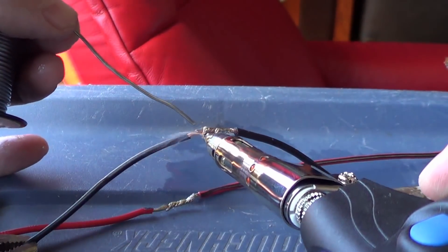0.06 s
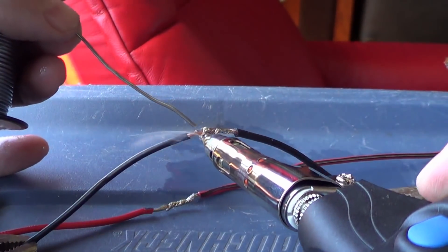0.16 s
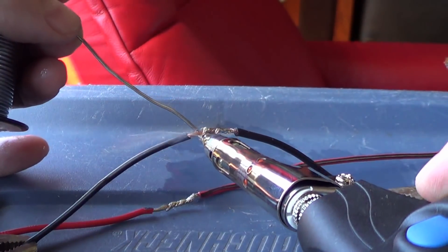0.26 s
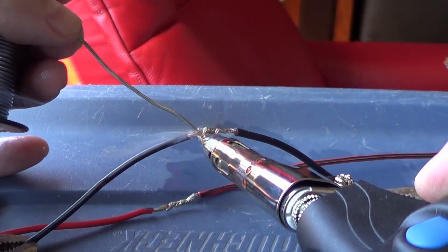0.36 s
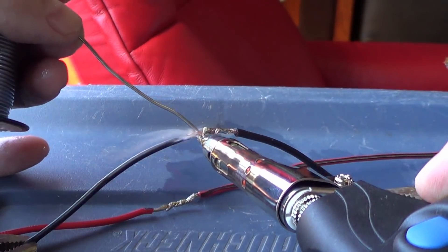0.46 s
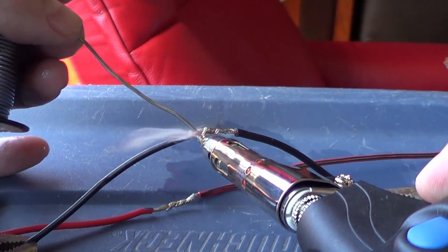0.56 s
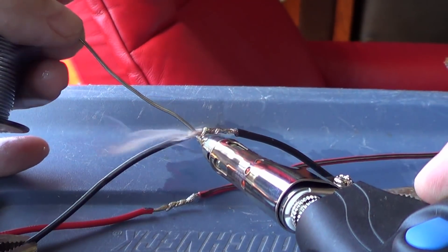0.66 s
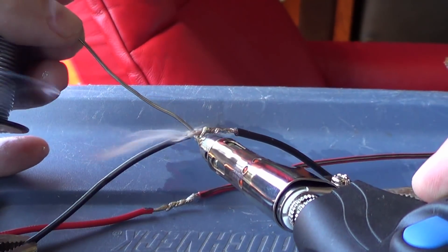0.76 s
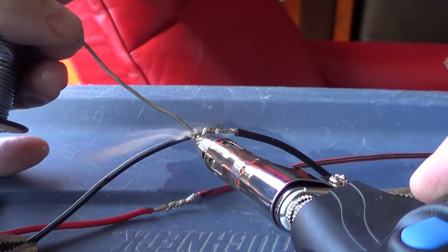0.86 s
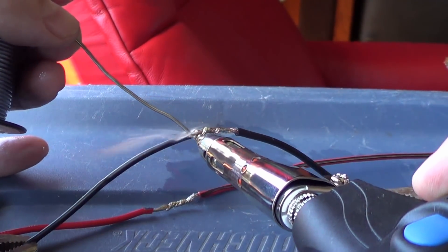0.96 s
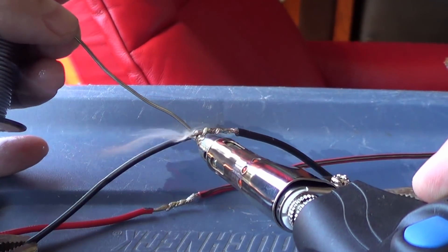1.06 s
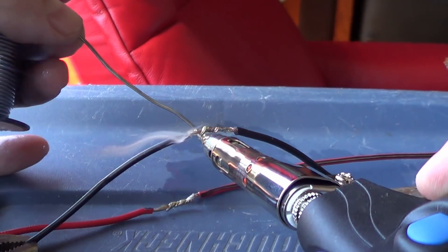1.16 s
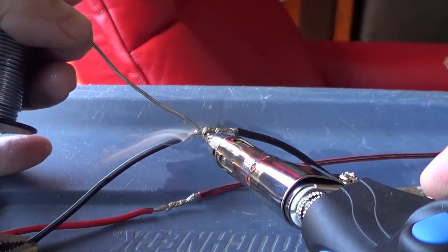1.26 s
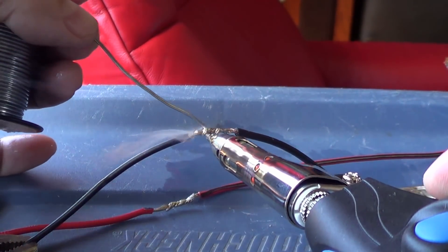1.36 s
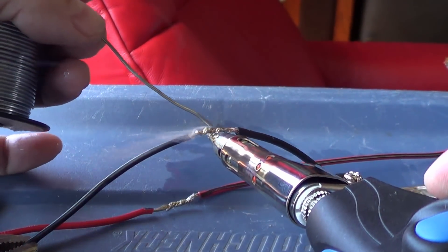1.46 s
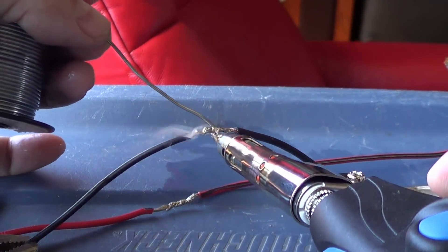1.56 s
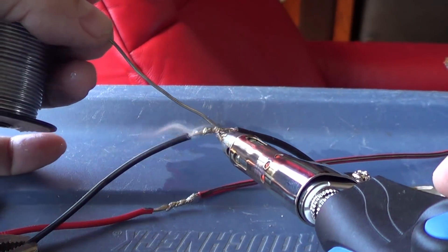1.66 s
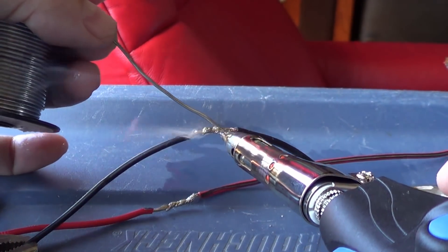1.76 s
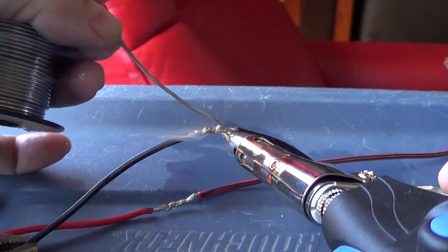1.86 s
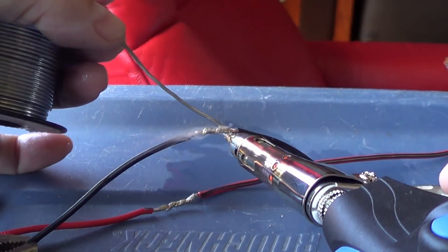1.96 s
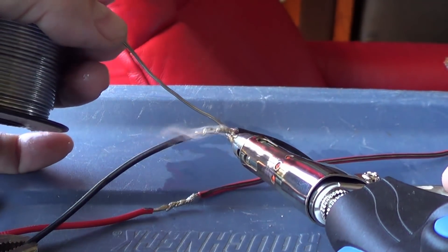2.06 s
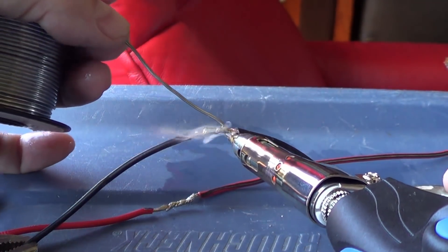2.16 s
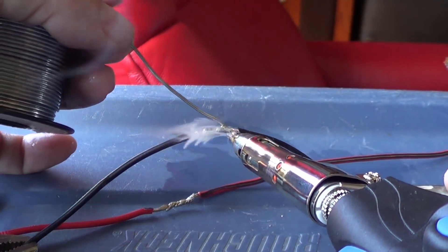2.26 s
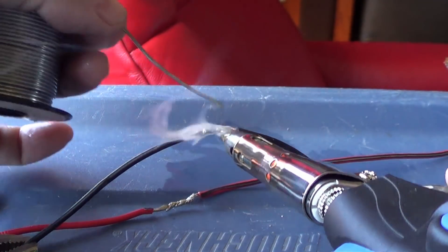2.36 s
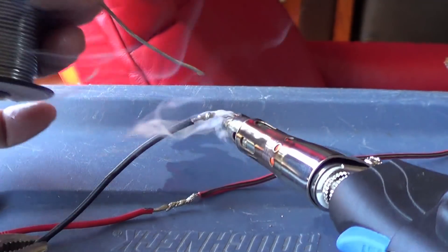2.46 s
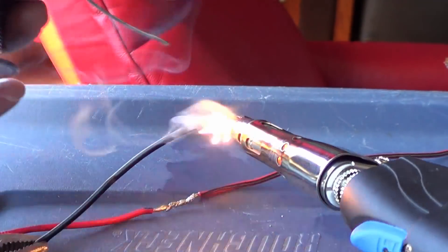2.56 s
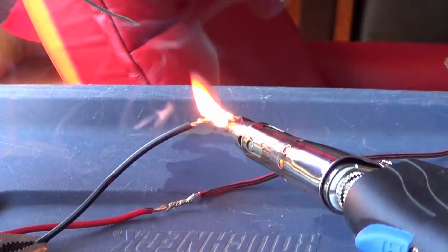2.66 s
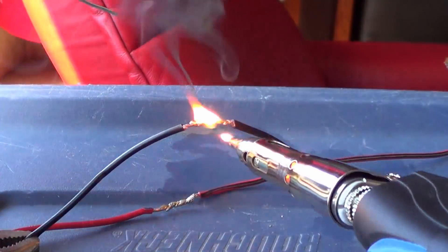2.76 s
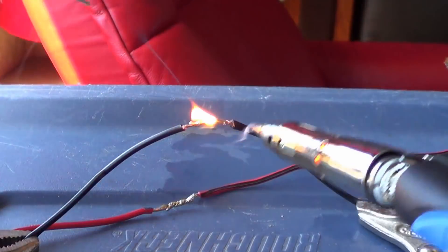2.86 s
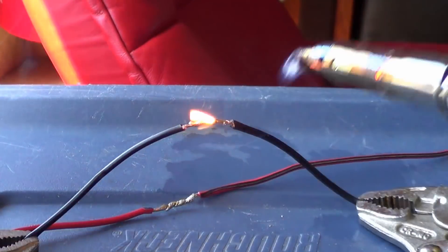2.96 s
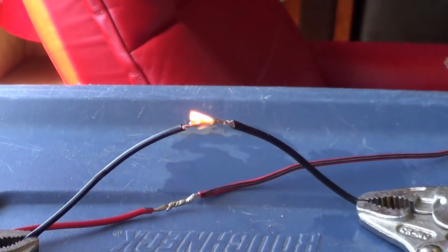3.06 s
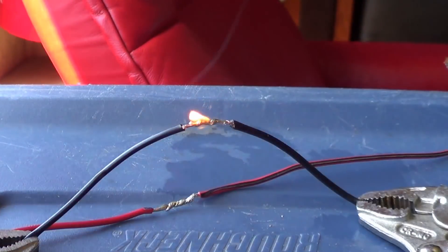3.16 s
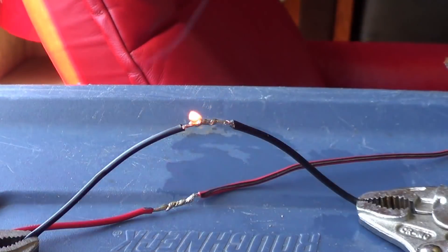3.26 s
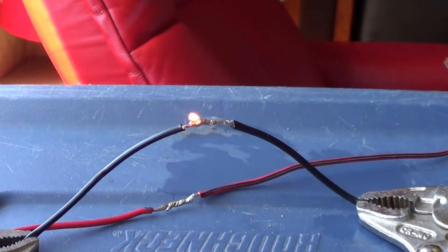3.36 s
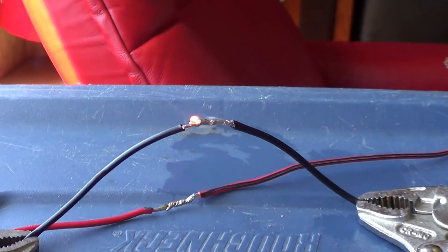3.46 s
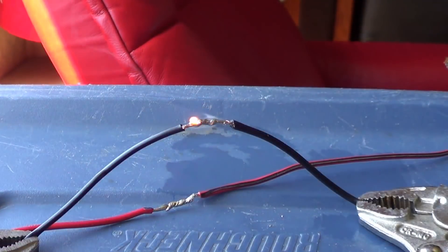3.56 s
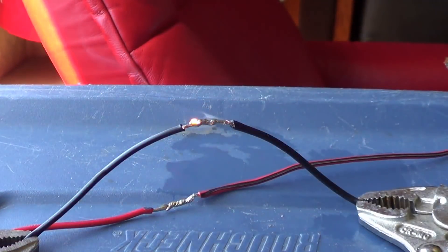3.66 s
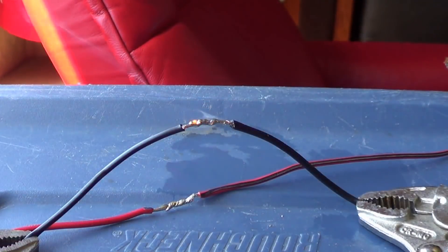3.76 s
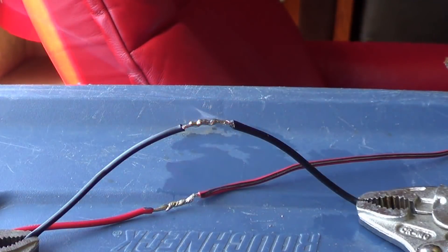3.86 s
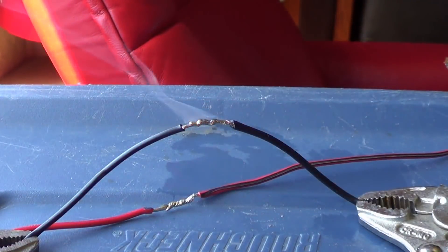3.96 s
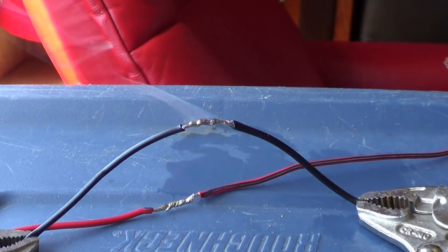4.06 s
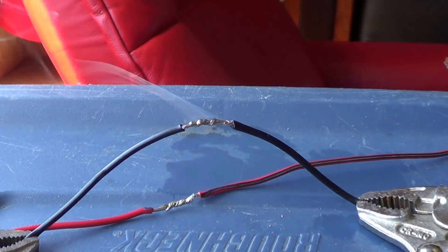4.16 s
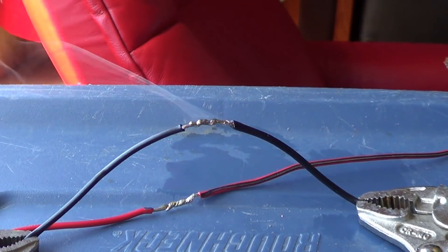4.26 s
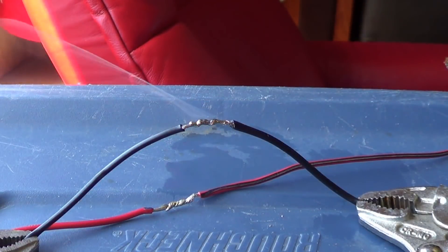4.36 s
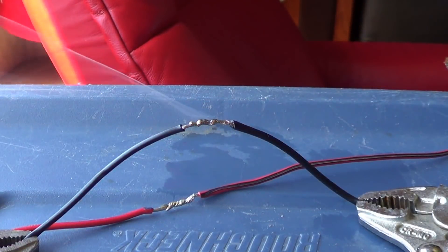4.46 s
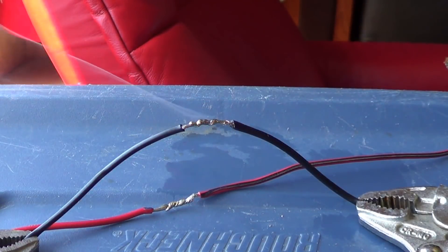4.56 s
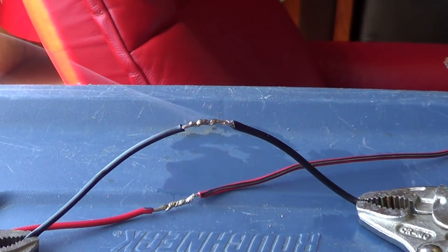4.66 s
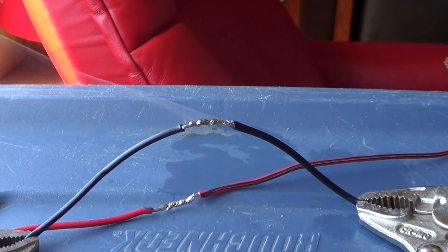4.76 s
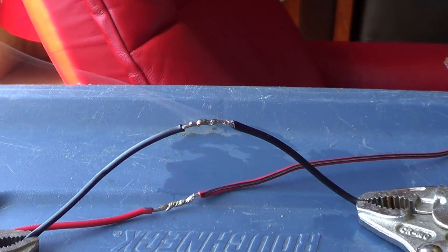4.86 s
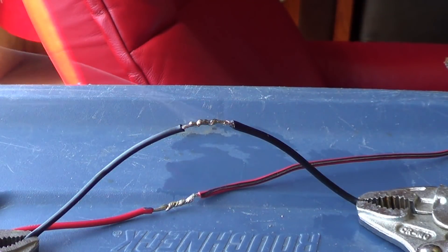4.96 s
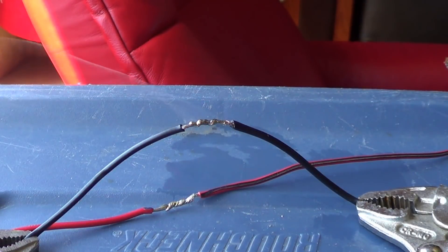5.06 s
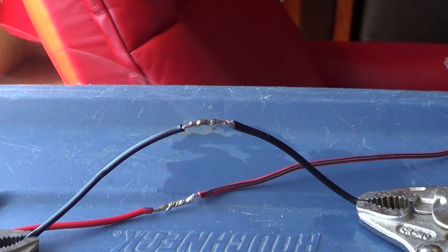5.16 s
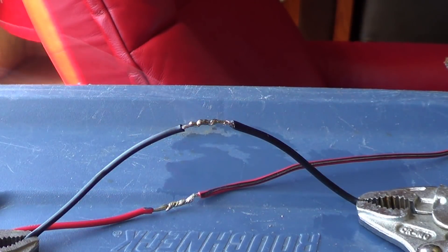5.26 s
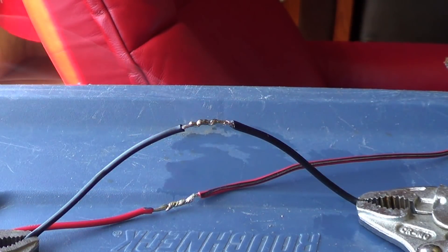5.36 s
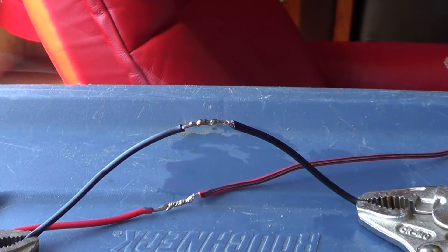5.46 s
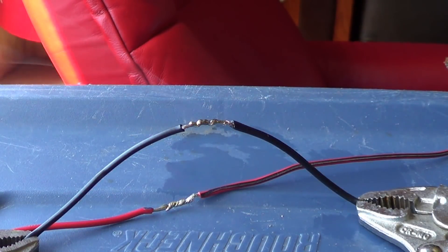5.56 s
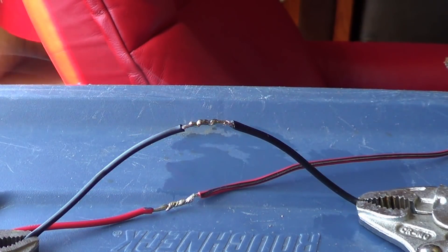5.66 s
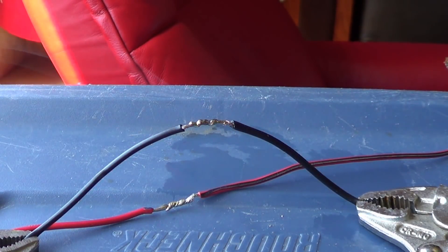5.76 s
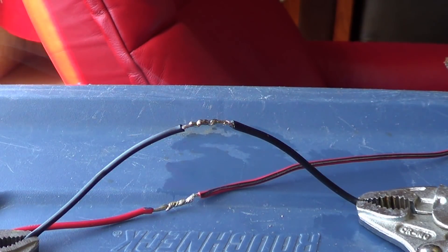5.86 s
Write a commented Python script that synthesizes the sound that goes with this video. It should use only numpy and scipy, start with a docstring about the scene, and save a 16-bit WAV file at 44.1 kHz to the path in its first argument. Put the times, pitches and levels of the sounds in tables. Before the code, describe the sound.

A small gas torch hisses loudly close up over a low roar, then swings away to the right and settles into a thinner, quieter hiss.

```python
"""Gas torch at a wire splice

A small gas torch burns close to a pair of microphones: noise shaped frame by frame gives a low roar and a hiss,
with whistles as resonant peaks. It heats a wire splice, is lifted away to the right, where its echo off
the table sweeps comb stripes through the hiss, and is held aside. A faint low hum, a wavering sine over
rumble, comes and goes, and a thin steady sine sits at the top."""
import sys
import numpy as np
from scipy import signal
from scipy.io import wavfile
from scipy.ndimage import uniform_filter1d

SR = 44100
rng = np.random.default_rng(int(sys.argv[2]) if len(sys.argv) > 2 else 0)


def unload_audio(sound):
    """Save the sound as a 16-bit wav file, at the path given as the first command line argument."""
    columns = np.transpose(np.atleast_2d(sound))
    # keep every value between -1 and 1, then stretch to whole-number steps
    steps = np.round(np.clip(columns, -1, 1) * 32767)
    wavfile.write(sys.argv[1], SR, steps.astype(np.int16))


N = 260631
FRAME = 1024   # samples
HOP = FRAME // 4
FRAME_S = np.arange(2 * N // (FRAME // 2) + 8) * HOP / SR
BIN_HZ = np.maximum(np.arange(FRAME // 2 + 1) * SR / FRAME, 1.0)[:, None]

# The hand moves the torch through places 0 at the wire, 1 turned, 2 lifted, 3 held aside.
# Each row: start in seconds, length in seconds, places moved.
MOVES = [(1.3, 0.99, 0.11), (2.45, 0.28, 0.96), (2.9, 0.26, 0.99), (4.6, 0.64, 0.81)]


def from_db(db):
    """Level to amplitude: 20 dB is a factor of ten."""
    return 10 ** (np.asarray(db) / 20)


def ramp(s, start, length):
    """Linear transition: rises evenly from 0 to 1 over the given time."""
    return np.clip((s - start) / max(length, 1e-3), 0, 1)


def spell(s, start, length, fade):
    """Gated envelope: fades in, holds at 1 and fades out."""
    return ramp(s, start - fade / 2, fade) * (1 - ramp(s, start + length - fade / 2, fade))


def place_of(moves):
    """Displacement as a running sum: the place at every frame adds up the moves made so far."""
    return sum(step * ramp(FRAME_S, start, length) for start, length, step in moves)


def at_hz(points):
    """Spectral envelope: a table interpolated over log frequency at every bin."""
    hz, values = np.transpose(points)
    return np.interp(np.log(BIN_HZ), np.log(hz), values)


def blend(place, *tables):
    """Spectral interpolation: glides from one table to the next as the place changes."""
    return sum(np.clip(1 - abs(place - k), 0, 1) * at_hz(points) for k, points in enumerate(tables))


def power_one(gain, low_hz, high_hz):
    """Band-power normalisation: white noise through every frame has rms 1 in the band."""
    band = (BIN_HZ >= low_hz) & (BIN_HZ < high_hz)
    return gain / np.sqrt(np.mean(gain ** 2 * band, axis=0))


def flicker(rate, width_hz):
    """Random modulation: noise smoothed over 1/rate seconds and width_hz, with spread 1."""
    bins = max(1, int(width_hz * FRAME / SR))
    frames = max(1, int(1 / (rate * FRAME_S[1])))
    field = rng.standard_normal((len(BIN_HZ), len(FRAME_S)))
    field = uniform_filter1d(field, bins, axis=0, mode="wrap")
    field = uniform_filter1d(field, frames, axis=1, mode="wrap")
    return field / field.std()


def shaped_noise(gain, alike, balance_db):
    """Time-varying filtering of stereo noise: mid and side shares set the coherence of the two sides."""
    white = rng.standard_normal((2, len(FRAME_S) * HOP - HOP))
    mid, side = signal.stft(white, nperseg=FRAME, noverlap=FRAME - HOP)[2][:, :, :len(FRAME_S)]
    shared = np.sqrt((1 + alike) / 2) * mid
    own = np.sqrt((1 - alike) / 2) * side
    left = (shared + own) * from_db(balance_db / 2)
    right = (shared - own) * from_db(-balance_db / 2)
    return signal.istft(gain * np.array([left, right]), nperseg=FRAME, noverlap=FRAME - HOP)[1][:, :N]


def steady_tone():
    """A pure tone: one sine of constant pitch and level."""
    tone_hz, rms_db = 15734, -66
    return from_db(rms_db) * np.sqrt(2) * np.sin(2 * np.pi * tone_hz * np.arange(N) / SR)


def hum():
    """Frequency and amplitude modulation: spells of a wavering low sine over lumpy band-limited rumble."""
    # Spells of hum with more rumble under them. Each row: start in seconds, length in seconds,
    # mean pitch in Hz, hum level in dB before its throb, added rumble gain in dB before its lumps.
    spells = [(-.1, 1.05, 72, -62, -69), (1.0, 0.24, 70, -77, -78), (1.336, 0.38, 70, -64, -61.5),
              (1.9, .43, 69.5, -78, -82), (2.76, 0.46, 67, -69, -80), (3.52, 0.1, 65.7, -70, -70),
              (4.15, 0.73, 63.7, -77, -71), (5.06, .1, 64, -87, -80)]
    fade_s, waver_hz, quiet_rumble_db = 0.054, 1.45, -83
    throb_db, lump_db, rumble_band_hz = 2.3, 4.5, (35, 155)
    t = np.arange(N) / SR
    waver, lumps, throb = [np.interp(t, FRAME_S, flicker(rate, 22000)[0]) for rate in (6, 9, 12)]
    tone, rumble_gain = 0, from_db(quiet_rumble_db)
    for start, length, hz, hum_db, rumble_db in spells:
        on = spell(t, start, length, fade_s)
        phase = 2 * np.pi * np.cumsum(hz + waver_hz * waver) / SR
        tone = tone + from_db(hum_db) * on * np.sqrt(2) * np.sin(phase)
        rumble_gain = rumble_gain + from_db(rumble_db) * on
    band = signal.butter(2, rumble_band_hz, "band", fs=SR, output="sos")
    noise = signal.sosfilt(band, rng.standard_normal((2, N + SR)))[:, SR:]   # drop the filter's onset
    noise = noise + 0.44 * noise[::-1]   # partly alike on both sides
    rumble = rumble_gain * from_db(lump_db * lumps) * noise / noise.std()
    return from_db(throb_db * throb) * tone + rumble


def echo(delays, colour):
    """Delay as a phase factor; random patches of time and frequency make the copy stronger or weaker."""
    fade_s = 0.076
    patchy = from_db(at_hz(colour)) * (.85 + .3 * flicker(5, 1500))
    out = 0
    for start, length, from_ms, to_ms, strength in delays:
        delay_ms = from_ms + (to_ms - from_ms) * ramp(FRAME_S, start, length)
        share = np.clip(strength * spell(FRAME_S, start, length, fade_s) * patchy, 0, .9)
        out = out + share * np.exp(-2j * np.pi * BIN_HZ * delay_ms / 1000)
    return out


def table_echo():
    """Reflection off the table: row by row the path delay slides evenly or holds still."""
    # Each row: start in seconds, length in seconds, first delay in ms, last delay in ms,
    # strength as a ratio before colour and patchiness.
    delays = [(2.96, .28, .29, .44, .75), (3.24, .2, .43, .43, .35), (3.43, .52, .43, .58, .7),
              (3.95, .25, .575, .57, .45), (4.2, .2, .57, .46, .55), (4.4, .25, .46, .46, .5),
              (4.65, .4, .47, .41, .4)]
    # What the table throws back. Each row: frequency in Hz, level in dB.
    colour = [(2500, -20), (3600, -9), (5000, -7), (6500, -1), (9000, 0), (10500, -10), (13000, -20)]
    return echo(delays, colour)


def swing_echo():
    """A second delayed path while the hand swings out, with a colour of its own."""
    # Each row: start in seconds, length in seconds, first delay in ms, last delay in ms,
    # strength as a ratio before colour and patchiness.
    delays = [(2.94, .31, .41, .81, .62)]
    # Colour of this echo. Each row: frequency in Hz, level in dB.
    colour = [(1100, -20), (1700, 0), (2500, -2), (3300, -16), (6000, -16), (7500, -4), (11000, -5),
              (14000, -12)]
    return echo(delays, colour)


def whistles(hiss_db, roar_place):
    """Resonance: jet noise rings in two peaks, a steady part under the hiss plus swells; returns power."""
    # Nozzle whistle, then top whistle. Each row: frequency at the wire in Hz, width in Hz.
    resonances = [(5400, 300), (12200, 900)]
    # Steady part of each whistle: one level each, in dB relative to the hiss.
    under_hiss_db = [-19.5, -23]
    # Each row: start in seconds, length in seconds, nozzle whistle in dB, top whistle in dB.
    swells = [(1.75, .8, -49, -38.5), (2.525, 0.19, -31, -40), (2.94, .3, -29.5, -42),
              (3.697, .2, -34.5, -44), (3.8, 0.39, -59, -47.5), (4.73, 0.57, -50, -44.5)]
    fade_s = 0.067
    sag = 0.041   # share by which the nozzle whistle sounds lower for each place the roar has moved
    power = 0
    for k, (hz, width) in enumerate(resonances):
        centre_hz = hz * (1 - sag * roar_place * (k == 0))
        peak = 1 / (1 + (2 * (BIN_HZ - centre_hz) / width) ** 2)   # a resonance passed twice
        steady = from_db(hiss_db + under_hiss_db[k]) ** 2
        swell = sum((from_db(row[2 + k]) * spell(FRAME_S, row[0], row[1], fade_s)) ** 2 for row in swells)
        power = power + (steady + swell) * power_one(peak, 20, 16000) ** 2
    return power


def hiss(hiss_db):
    """Jet noise and comb interference: direct sound and echoes cancel in stripes; returns power."""
    # Colour heard from each place. Each row: frequency in Hz, level per Hz in dB.
    at_wire, turned = [(820, -59), (1400, -21.5), (1800, -1.5), (2300, -9), (2810, -21), (3240, -13.5),
                       (4700, -16), (5390, 4), (6150, -10), (6990, 0.5), (8150, -1), (8700, -9),
                       (10400, -14), (14900, -15.5), (15700, -28)], [(820, -53), (1400, -24), (1700, -7), (1900, -5.5), (2160, -19),
                                             (2730, -18), (3240, -19.5), (4300, -20), (5370, 2), (5830, -5),
                                             (7810, -4), (10700, -24), (12300, -11), (15700, -34)]
    lifted, aside = [(710, -65), (1200, -10.5), (1520, -2.5), (2100, 3), (3410, -8), (4560, 1), (5180, 2.5),
                     (5830, -2), (7310, 1.5), (8590, -1.5), (11000, -13), (12500, -9), (15700, -14)], [(800, -32), (1600, -12), (2100, -5), (2990, -10.5), (3560, -20.5),
                                          (4150, -15), (4450, -3.5), (5000, 0), (5750, -5.5), (7100, -15),
                                          (8050, -2.5), (9700, -20), (12000, -6.5), (13400, -15.5),
                                          (14700, -11), (15700, -19)]
    comb = abs(1 + table_echo() + swing_echo())
    colour = from_db(blend(place_of(MOVES), at_wire, turned, lifted, aside)) * comb
    return (from_db(hiss_db) * power_one(colour, 6000, 10000)) ** 2


def roar(roar_db, roar_place):
    """Broadband combustion noise whose colour glides with place; returns power."""
    # Colour heard from each place. Each row: frequency in Hz, level per Hz in dB.
    at_wire, lifted, aside = [(82, -55), (140, -22), (308, -3.5), (352, -2.5), (390, -6), (459, -6.5),
                              (520, 0), (627, -1), (830, -8), (1040, -14), (1220, -12), (1400, -20),
                              (1820, -49), (3080, -120)], [(94, -68), (160, -48), (221, -9), (285, -9),
                                                    (346, -5.5), (575, -17), (617, -10.5), (686, -28.5),
                                                    (729, -12), (1300, -20), (1690, -35), (2860, -120)], [(94, -58), (160, -21.5), (285, -6),
                                                                         (374, -0.5), (435, -15),
                                                                         (500, -2.5), (892, -11.5),
                                                                         (965, -4), (1230, -29),
                                                                         (1300, -21), (1690, -46),
                                                                         (2860, -120)]
    colour = from_db(blend(roar_place, at_wire, lifted, aside))
    return (from_db(roar_db) * power_one(colour, 150, 1300)) ** 2


def torch():
    """Power addition: roar, hiss and whistles share one turbulent flow; returns gain by frequency and time."""
    # Levels before the flicker. Each row: time in seconds, roar in dB (150-1300 Hz), hiss in dB (6-10 kHz).
    levels = [(0, -32, -25.5), (1.2, -32, -25.5), (2.5, -32, -25), (2.9, -32, -25.5), (3.1, -33, -30),
              (3.28, -34, -32), (3.45, -37, -31), (3.75, -39.5, -33.5), (4.05, -42, -36.5),
              (4.55, -42, -36), (5.0, -41.5, -38.5), (5.91, -42.5, -37.5)]
    # The roar spreads all round and changes later, through places 0 at the wire, 1 lifted, 2 held aside.
    # Each row: start in seconds, length in seconds, places moved.
    roar_moves = [(3.05, 0.99, 0.74), (4.65, .35, 0.89)]
    ripple_db, puff_db, puffs_below_hz = 2, 5, 280
    seconds, *columns = np.transpose(levels)
    roar_db, hiss_db = [np.interp(FRAME_S, seconds, column) for column in columns]
    roar_place = place_of(roar_moves)
    power = roar(roar_db, roar_place) + hiss(hiss_db) + whistles(hiss_db, roar_place)
    # narrow ripples drift slowly, and the bottom of the roar comes in puffs
    bass = np.clip(2 - 2 * BIN_HZ / puffs_below_hz, 0, 1)
    drift_db = ripple_db * flicker(1.494, 90) + puff_db * bass * flicker(7.4, 220)
    # the whole flow trembles together, and patches of the treble flicker on their own
    treble = np.clip(BIN_HZ / 5000, 0, 1)
    tremble_db = 0.2 * flicker(25, 20800) + 0.94 * treble * flicker(30, 1500)
    return np.sqrt(power) * from_db(drift_db + tremble_db)


def flame():
    """Stereo imaging: coherence and level difference place the torch between the microphones."""
    # Each row: frequency in Hz, left-right likeness as a correlation.
    likeness_at_wire, likeness_aside = [(60, 0.73), (130, 0.67), (290, 0.95), (640, 0.93), (1410, 0.98),
                                        (3100, 0.91), (6820, 0.92), (15000, 0.92)], [(60, 0.57), (130, 0.57), (290, 0.99),
                                                                  (640, 0.81), (1410, 0.58), (3100, 0.65),
                                                                  (6820, 0.56), (15000, 0.94)]
    # Each row: frequency in Hz, left minus right in dB.
    balance_at_wire, balance_aside = [(60, -1.0), (92, -1.0), (140, -5), (210, 0.5), (330, -1.5),
                                      (500, -0.5), (770, -0.8), (1170, -4.5), (1790, -0.8), (2740, 0.5),
                                      (4190, -2.5), (6410, -1.8), (9810, -0.18), (15000, -0.5)], [(60, -0.5), (92, 0.0), (140, -2), (210, 1),
                                                               (330, -1.5), (500, -1.5), (770, -2),
                                                               (1170, -2.5), (1790, -5), (2740, -6.5),
                                                               (4190, -5.5), (6410, -4), (9810, -1),
                                                               (15000, 0.5)]
    aside = np.clip(place_of(MOVES) - 1, 0, 1)
    alike = np.clip(blend(aside, likeness_at_wire, likeness_aside), 0, 1)
    return shaped_noise(torch(), alike, blend(aside, balance_at_wire, balance_aside))


def scene():
    """Superposition: the steady tone, the hum with its rumble and the flame add up."""
    return steady_tone() + hum() + flame()


def record(dry):
    """Band limiting: a steep elliptic low-pass cuts the top."""
    cutoff_hz = 15770
    return signal.sosfilt(signal.ellip(14, .5, 80, cutoff_hz, fs=SR, output="sos"), dry)


dry = scene()
out = record(dry)
unload_audio(out)
```